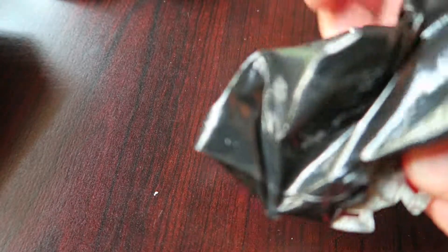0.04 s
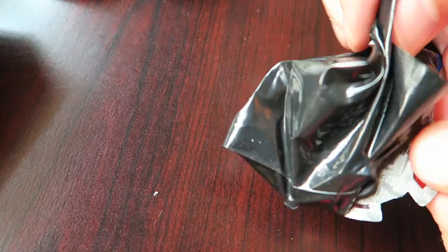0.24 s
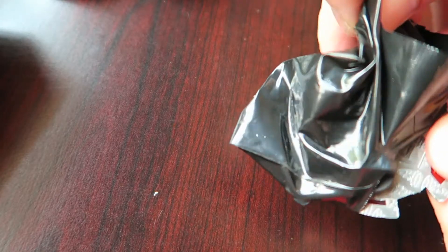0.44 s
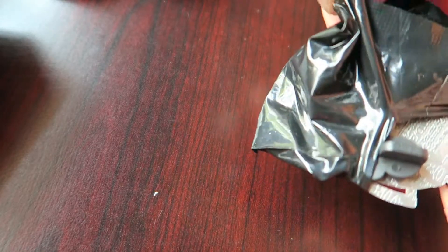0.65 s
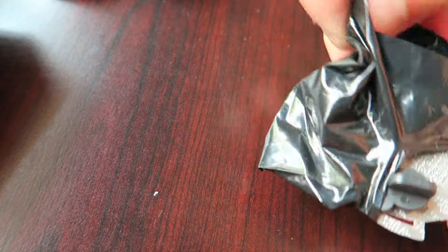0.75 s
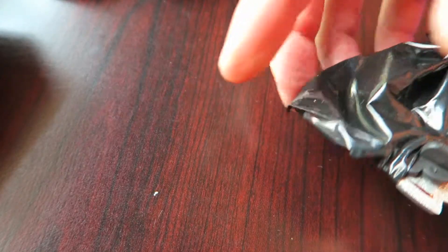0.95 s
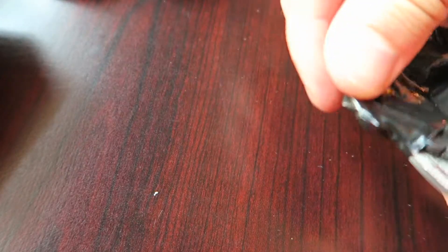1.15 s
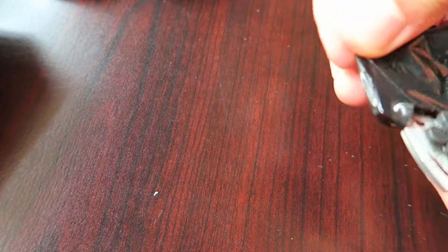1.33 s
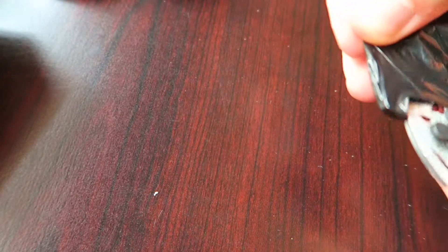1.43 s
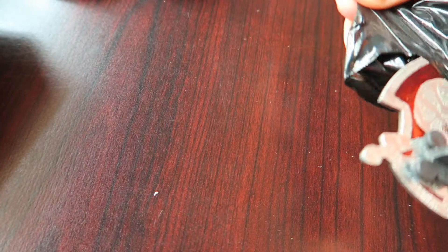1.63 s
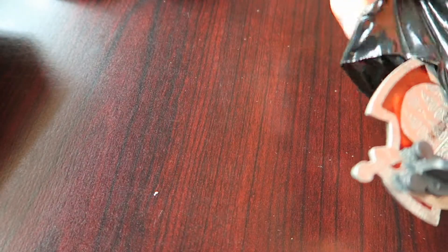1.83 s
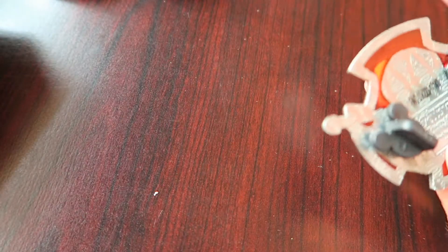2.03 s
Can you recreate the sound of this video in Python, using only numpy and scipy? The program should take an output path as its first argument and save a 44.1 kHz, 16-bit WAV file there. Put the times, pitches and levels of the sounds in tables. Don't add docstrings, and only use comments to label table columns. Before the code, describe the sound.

A crisp foil bag crackles and snaps close up as hands squeeze and open it

```python
import sys
import numpy as np
from scipy import signal
from scipy.fft import rfft, irfft, next_fast_len
from scipy.io import wavfile
from scipy.ndimage import uniform_filter1d

SR = 44100
rng = np.random.default_rng(int(sys.argv[2]) if len(sys.argv) > 2 else 0)


def ratio_of_db(decibels):
    return 10 ** (np.asarray(decibels, float) / 20)


def bounce(signal):
    frames = np.transpose(np.atleast_2d(signal))
    limited = np.clip(frames, -1, 1)
    pcm = np.round(limited * 32767).astype(np.int16)
    wavfile.write(sys.argv[1], SR, pcm)


N = 91683

# freq_hz, level_db (per Hz)
HUM_SPECTRUM = [(20, -7), (120, 2), (210, 0.5), (330, 1), (1500, -18), (7000, -67), (16000, -11)]
# freq_hz, width_hz, over_rumble_db
MOTOR_TONES = [
    (120.9, 6.5, 10),
    (211.2, 11, 7.5),
]
# freq_hz, likeness (-1 to 1)
HUM_LIKENESS = [(90, 1), (200, 0.23), (450, -0.69), (1650, -0.56), (15000, -0.28)]
HUM_DB = -47

# freq_hz, t60_s
ROOM_DECAY = [(1500, 0.1), (5000, 0.11), (12000, 0.21)]
ROOM_DB = -14

# freq_hz, level_db
FILM_TONE = [(120, -11.5), (400, 2.5), (1400, 1.5), (3500, -0.5), (6000, -9.5), (11000, -21), (16000, -7.5)]
# start_s, crackle_db
HAND_PRESSURE = [(0, -45.5), (0.026, -23), (0.079, -54), (.14, -39.5), (.24, -46), (.3, -44), (.39, -48.5),
                 (0.602, -38.5), (.68, -45.5), (.79, -60.5), (0.892, -30), (1.0, -51.5), (1.2, -45),
                 (1.43, -45.5), (1.55, -54.5), (1.69, -43.5), (1.779, -54), (2.0, -37.5)]
GRAIN_HZ, GRAIN_SPREAD_OCTAVES, GRAIN_CYCLES = 2500, 0.88, 11
GRAIN_SCATTER_DB, RUSTLE_DB = 3, -4

# start_s, peak_db, ring_hz
PANEL_FLIPS = [(0.022, -23.5, 360), (0.357, -26.5, 473), (.502, -23, 317), (.577, -13.5, 301),
               (0.627, -16, 497), (.878, -15, 489), (1.057, -18.5, 470), (1.147, -19.5, 668),
               (1.4321, -9, 1406), (1.6661, -12.5, 504), (1.6662, -13.5, 725), (1.992, -25, 468),
               (2.066, -25.5, 444)]
# freq_hz, width_hz, level_db
BAG_AIR = [
    (118, 106, 8.5),
    (260, 200, 4),
    (484, 39, 12),
    (725, 56, 9),
    (1197, 85, 21),
]
BAG_DB, PANEL_CYCLES = -6.5, 41

# start_s, peak_db, patch_hz, brightness_db
LOUD_SNAPS = [(0.0119, -19, 2660, 5), (0.1156, -17.5, 1440, 5), (0.1742, -9, 2930, -43),
              (0.2174, -10, 2310, -0.5), (0.2623, -18, 2580, -2), (0.2752, -12.5, 3600, 2),
              (0.2809, -12, 6260, -29), (0.285, -11.5, 3520, -10), (0.2912, -13, 1340, 12.5),
              (0.3099, -5, 3590, 3.5), (0.3183, -33, 2660, 11), (0.3593, -22, 2470, 7),
              (0.4346, -11, 3010, -11), (0.4384, -12.5, 2610, -4.5), (0.4515, -15, 3260, -2),
              (0.5025, -11.5, 3000, -6.5), (0.5455, -11.5, 1490, -4), (0.5762, -13.5, 1050, 8.5),
              (0.5834, -7, 1940, 1), (0.5892, -14, 1820, 3.5), (0.5961, -6.5, 2700, -6),
              (0.6021, -18.5, 1210, 1), (0.6094, -12.5, 3200, 10), (0.6239, -15.5, 3100, 10),
              (0.6269, -10.5, 2200, 4), (0.6983, -19, 2980, -4.5), (0.7409, -14, 1575, 0),
              (0.8517, -10.5, 3470, -8), (0.8784, -11.5, 880, 9.5), (0.8966, -13.5, 3200, 4.5),
              (0.9209, -12.5, 2980, -1), (0.9421, -1, 3370, -22), (1.0246, -6, 3040, -12.5),
              (1.0569, -11.5, 1450, -54), (1.1477, -15, 3300, -37), (1.1844, -12.5, 3140, 5),
              (1.2355, -16.5, 1450, 4), (1.252, -14, 1940, -12), (1.2784, -13, 2200, 1.5),
              (1.2863, -11.5, 3600, -11), (1.317, -18, 1440, 1), (1.4313, -11.5, 1476, 0.5),
              (1.4933, -17.5, 4320, 4), (1.4976, -18.5, 4040, -4.5), (1.6658, -7.5, 1390, -2.5),
              (1.667, -11.5, 5200, -8), (1.681, -11, 2500.0, -1), (1.6905, -20.5, 1870, -10.7),
              (1.6974, -20, 1510.0, 5), (1.713, -20.5, 2470, 5.5), (1.7208, -18.5, 4460, -7),
              (1.8794, -18, 2420, 5), (1.9172, -11, 4000, -1), (1.926, -14, 3530, -1.5),
              (1.9691, -15.5, 5970, -21), (1.9924, -14.5, 1155, 6), (2.0015, -11, 2560, -21),
              (2.0075, -10, 2520, -43), (2.0493, -13.5, 3950, 0), (2.0662, -15.5, 1630, -4)]
# start_s, peak_db, patch_hz
LIGHT_TICKS = [(0.019, -26, 3240), (0.0283, -15, 3480), (0.1055, -20, 3070), (0.153, -28, 1230),
               (0.1989, -21, 3000), (0.4608, -21.5, 3160), (0.526, -18.5, 3100), (0.5639, -22.5, 700),
               (0.802, -34.5, 1500.0), (0.81, -38, 3120), (0.834, -21.5, 1260), (1.121, -22, 1480),
               (1.128, -23.5, 2800), (1.1438, -18.5, 2500), (1.2, -16.5, 1020), (1.222, -22.5, 2130),
               (1.3132, -19, 1350), (1.4175, -24, 2180), (1.4264, -17, 4040), (1.4523, -19.5, 1670),
               (1.594, -28, 4080), (1.653, -26, 4600), (1.807, -25.5, 1420), (1.8392, -26, 2550),
               (1.96, -17.5, 3050), (2.0414, -25, 760), (2.0535, -17, 4500),
               (0.0048, -22, 2630), (0.0234, -16.5, 2860), (0.0381, -22, 2960), (0.07, -26.5, 1590),
                 (0.0764, -32, 3060), (0.0904, -26, 1550), (0.1243, -26, 1590.0), (0.1479, -23.5, 1620),
                 (0.162, -35, 1420.0), (0.2584, -27, 2700), (0.2997, -30, 3600.0), (0.3336, -20.5, 2630),
                 (0.443, -17.5, 2500.0), (0.5233, -19.5, 3530.0), (0.5321, -29, 3320.0), (0.555, -25, 1110),
                 (0.5781, -14, 830), (0.5801, -14, 1040), (0.6192, -14.5, 2970.0), (0.7542, -31, 2770),
                 (0.8155, -38, 1550.0), (0.828, -29, 4600), (0.8582, -29, 1720.0), (0.8713, -31, 2610.0),
                 (0.889, -15.5, 1470), (0.9298, -18.5, 2960), (0.9337, -19.5, 2410.0), (1.011, -38, 2260),
                 (1.0452, -44, 2710.0), (1.2109, -26, 1120.0), (1.241, -29, 1400), (1.2808, -16, 1250.0),
                 (1.2953, -23, 1100), (1.3438, -33, 1270.0), (1.367, -33.5, 1800), (1.3796, -42, 1890.0),
                 (1.4053, -31.5, 1150), (1.4106, -28, 2840.0), (1.4282, -20.5, 1330), (1.4354, -17, 1380),
                 (1.4413, -31, 1570), (1.482, -31, 2160), (1.4997, -23.5, 2560.0), (1.6063, -25.5, 1750),
                 (1.6203, -45, 1550.0), (1.632, -40, 2100), (1.6476, -31, 2110), (1.6587, -23, 4290.0),
                 (1.6856, -13.5, 4400), (1.7277, -23.5, 4440), (1.7466, -30.5, 4330), (1.7973, -29, 9100),
                 (1.8471, -28.5, 2580.0), (1.8532, -32, 2500.0), (1.8715, -25, 3060),
                 (1.8974, -24.5, 4350.0), (1.9397, -27, 2260), (1.9454, -38, 2280), (1.9637, -20.5, 1510.0),
                 (1.9722, -19, 1670),
               (.3205, -20, 8600), (.5578, -36, 7500), (.613, -15, 6500), (1.0585, -21, 2740),
               (1.172, -37, 7000), (1.6457, -35, 4500), (1.6692, -13.5, 4900), (1.6745, -17, 870),
               (1.813, -32.5, 5000), (1.989, -24, 7000), (1.9795, -27, 5800), (2.023, -36, 3020)]
TICK_BRIGHT_DB, BRIGHT_DB_PER_OCTAVE = -5.5, -1
PATCH_CYCLES, PATCH_SPREAD_OCTAVES = 22, 0.45
MAIN_DB, SIDE_DB, SIDE_SCATTER_DB, STAGGER_S = 2, -5.5, 1, 0.0004
SIDE_FOLLOWS = 0.13
BELOW_LOSS_DB = 9
DAMPED_HZ = 1500
AFTER_S, AFTER_DB, AFTER_SCATTER_DB = 0.022, -17, 6
CRACK_T60_S, CRACK_DB, BROAD_DB = 0.0055, 5, -7.5
BUILD_S, FIZZ_T60_S = 0.0029, 0.061
FIZZ_DB, FIZZ_LUMPS_DB, FIZZ_ABOVE_HZ = -13.5, 5, 1800
APART_DB = -12.5

RIGHT_LEAD_S, LEAD_SCATTER_S, PAN_DB = 2.3e-5, 1.6e-5, -0.6
# freq_hz, level_db
MIC_TONE = [(20, -1), (50, 0.8), (11500, 1.5), (13000, -6.5), (14000, -18), (16000, -16), (16600, -41)]


def unit(x):
    return x / np.sqrt(np.mean(x ** 2) + 1e-20)


def along(points, hz):
    f, v = np.transpose(points)
    return np.interp(np.log(hz + 1), np.log(f + 1), v)


def filtered(x, response):
    m = next_fast_len(N + 8192)
    return irfft(rfft(x, m) * response(np.fft.rfftfreq(m, 1 / SR)), m)[..., :N]


def film(hz):
    return ratio_of_db(along(FILM_TONE, hz))


def place(s, shapes):
    at = np.round(s * SR).astype(int)[:, None] + np.arange(shapes.shape[1])
    at = np.where((at < 0) | (at > N), N, at)
    return np.bincount(at.ravel(), shapes.ravel(), N + 1)[:N]


def rings(s, db, hz, cycles, phase, size):
    hz = np.clip(hz, 150, 15000)[:, None]
    lead = RIGHT_LEAD_S + LEAD_SCATTER_S * np.sin(977 * s)[:, None]
    ports = []
    for shift in (-lead / 2, lead / 2):
        t = np.maximum(np.arange(size) / SR + shift, 0)
        decay = ratio_of_db(db[:, None] - 60 * t * (hz + DAMPED_HZ) / cycles)
        onset = 1 - np.exp(-1.5 * t * hz)
        ports.append(place(s, decay * onset * np.sin(2 * np.pi * hz * t + phase[:, None])))
    return np.array(ports)


def lagged(x):
    side = np.array([[-1], [1]])
    return filtered(x, lambda f: np.exp(1j * np.pi * f * RIGHT_LEAD_S * side))


def hum():
    def spread(f):
        tones = sum(db * np.exp(-((f - c) / w) ** 2) for c, w, db in MOTOR_TONES)
        gain = ratio_of_db(along(HUM_SPECTRUM, f) + tones)
        turn = np.arccos(np.clip(along(HUM_LIKENESS, f), -1, 1)) / 2
        return gain * [np.cos(turn), np.sin(turn)]

    mid, side = filtered(rng.standard_normal((2, N)), spread)
    return ratio_of_db(HUM_DB) * unit(np.array([mid + side, mid - side]))


def room(x):
    out, step = np.zeros((2, N + SR)), SR // 4
    for start in range(0, N, step):
        hz, t, z = signal.stft(rng.standard_normal((2, SR // 3)), SR, nperseg=256)
        decay = ratio_of_db(-60 * t / along(ROOM_DECAY, hz)[:, None])
        tail = signal.istft(z * decay, SR, nperseg=256)[1]
        wet = signal.fftconvolve(x[None, start:start + step], tail / np.linalg.norm(tail[0]), axes=1)
        first = start + 60
        out[:, first:first + wet.shape[1]] += wet
    return out[:, :N]


def crackle():
    at, level_db = np.transpose(HAND_PRESSURE)
    u, z = rng.random((2500, 3)), rng.standard_normal((2500, 2))
    s = u[:, 0] * N / SR
    octaves = GRAIN_SPREAD_OCTAVES * z[:, 0]
    db = np.interp(s, at, level_db) - GRAIN_SCATTER_DB * np.log(1.05 - u[:, 1])
    db += BELOW_LOSS_DB * np.minimum(octaves, 0.5 - octaves)
    grains = rings(s, db, GRAIN_HZ * 2 ** octaves, GRAIN_CYCLES, 2 * np.pi * u[:, 2], size=300)
    hiss = unit(filtered(rng.standard_normal(N), film))
    pressure = ratio_of_db(np.interp(np.arange(N) / SR, at, level_db) + RUSTLE_DB)
    return grains + lagged(hiss * pressure)


def thumps():
    s, db, hz = np.transpose(PANEL_FLIPS)
    u = rng.random((len(s), 2))
    direction = np.sign(u[:, 1] - 0.5)
    strength = ratio_of_db(db + BAG_DB) * 400 / hz * direction
    push = place(s, strength[:, None] * np.hanning(20))

    def air_modes(f):
        total = 0
        for k, (c, w, db) in enumerate(BAG_AIR):
            total = total + (-1) ** k * ratio_of_db(db) * 1j * f * w / (c * c - f * f + 1j * f * w)
        return total

    panels = rings(s, db, hz, PANEL_CYCLES, 2 * np.pi * u[:, 0], size=1500)
    return panels + filtered(push, air_modes)


def patches(s, db, hz, bright_db, u, z):
    out = rings(s, db + MAIN_DB, hz, PATCH_CYCLES, 2 * np.pi * u[:, 0], size=700)
    follow_db = SIDE_FOLLOWS * np.clip(bright_db, -20, 5)
    for k in range(1, 6):
        octaves = PATCH_SPREAD_OCTAVES * (k - 2.6 + u[:, k + 25]) - 0.3
        start = s - 0.0001 + STAGGER_S * u[:, k + 5]
        side_db = db + SIDE_DB + follow_db + SIDE_SCATTER_DB * z[:, k + 5]
        side_db += BELOW_LOSS_DB * np.minimum(octaves, 0)
        out += rings(start, side_db, hz * 2 ** octaves, PATCH_CYCLES, 2 * np.pi * u[:, k], size=700)
    return out


def aftershocks(s, db, hz, u, z):
    out = np.zeros((2, N))
    for k in range(11, 21):
        late = -AFTER_S * np.log(1 - u[:, k])
        octaves = GRAIN_SPREAD_OCTAVES * z[:, k]
        after_db = db + AFTER_DB - 4 * late / AFTER_S + AFTER_SCATTER_DB * z[:, k - 10]
        after_db += BELOW_LOSS_DB * np.minimum(octaves, 0)
        out += rings(s + 0.002 + late, after_db, hz * 2 ** octaves, GRAIN_CYCLES,
                     2 * np.pi * u[:, k - 10], size=400)
    return out


def cracks(s, db, bright_db):
    t = np.arange(500) / SR
    envelope = ratio_of_db(-60 * t / CRACK_T60_S) * (1 - np.exp(-t / 0.00023))
    burst = rng.standard_normal((len(s), 3, len(t))) * envelope
    gain = ratio_of_db(db + bright_db + CRACK_DB)[:, None]
    crack = np.array([place(s, burst[:, k] * gain) for k in range(3)])
    high = signal.sosfilt(signal.butter(3, 5500, "hp", fs=SR, output="sos"), crack)
    broad = place(s, burst[:, 0] * ratio_of_db(db + BROAD_DB)[:, None])
    shared = lagged(filtered(broad + 2 * high[0], film))
    return shared + ratio_of_db(APART_DB) * filtered(2 * high[1:], film)


def fizz(s, db, bright_db):
    since = np.arange(SR // 10) / SR - 0.02
    shape = np.where(since < 0, np.exp(since / BUILD_S), ratio_of_db(-60 * since / FIZZ_T60_S))
    settle = place(s - 0.02, ratio_of_db(db + bright_db + FIZZ_DB)[:, None] * shape)
    lumps = ratio_of_db(FIZZ_LUMPS_DB * unit(uniform_filter1d(rng.standard_normal(N), size=40)))
    hiss = rng.standard_normal((3, N))
    ports = hiss[0] + ratio_of_db(APART_DB) * hiss[1:]
    return filtered(settle * lumps * ports, lambda f: film(f) * f / (f + FIZZ_ABOVE_HZ))


def snaps():
    rows = LOUD_SNAPS
    for start, peak_db, pitch in LIGHT_TICKS:
        bright = TICK_BRIGHT_DB + BRIGHT_DB_PER_OCTAVE * np.log2(pitch / 2500)
        rows = rows + [(start, peak_db, pitch, bright)]
    s, db, hz, bright_db = np.transpose(rows)
    u = rng.random((len(s), 40))
    z = 3.5 * (u[:, ::-1] - 0.5)
    ringing = patches(s, db, hz, bright_db, u, z) + aftershocks(s, db, hz, u, z)
    return ringing + fizz(s, db, bright_db) + cracks(s, db, bright_db)


def scene():
    bag = snaps() + thumps() + crackle()
    pan = ratio_of_db([[PAN_DB / 2], [-PAN_DB / 2]])
    return bag * pan + ratio_of_db(ROOM_DB) * room(bag.mean(0)) + hum()


def low_pass(x):
    return signal.sosfilt(signal.butter(12, 16510, fs=SR, output="sos"), x)


def record(dry):
    heard = filtered(dry, lambda f: ratio_of_db(along(MIC_TONE, f)))
    limited = heard / (1 + np.abs(heard / 0.97) ** 8) ** (1 / 8)
    return low_pass(limited)


dry = scene()
out = record(dry)
bounce(out)
```